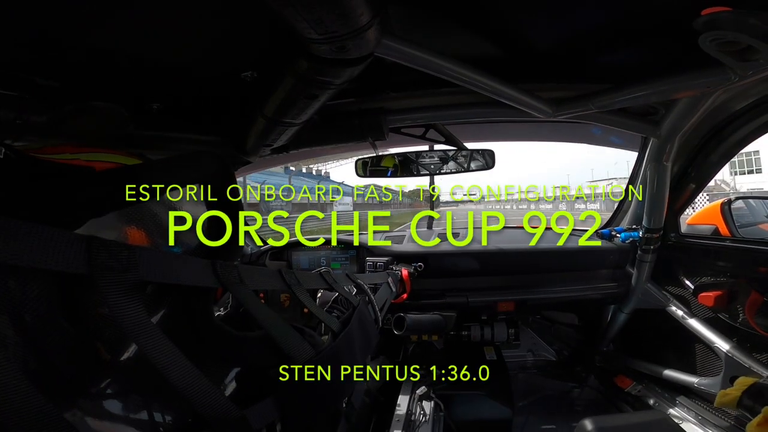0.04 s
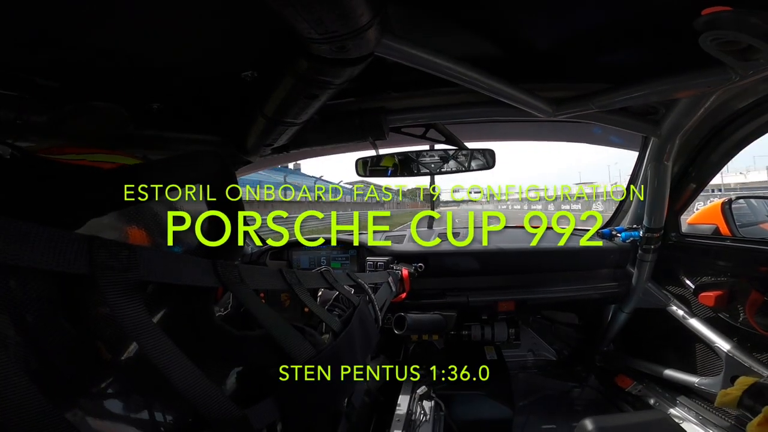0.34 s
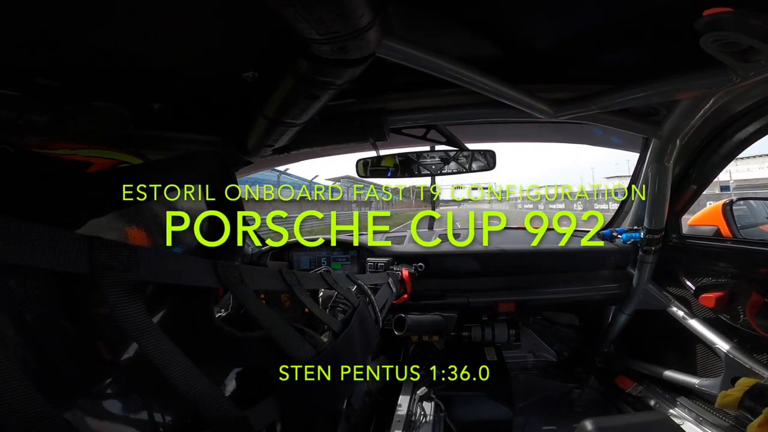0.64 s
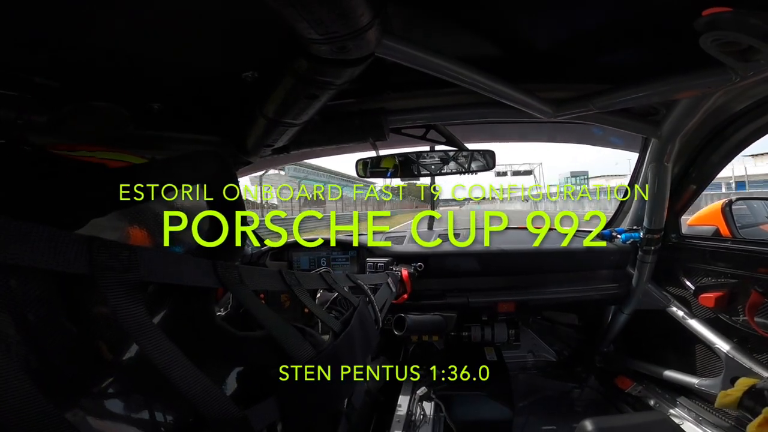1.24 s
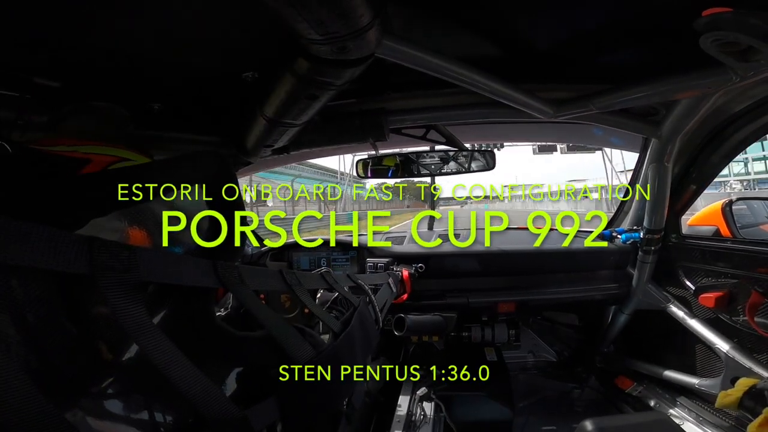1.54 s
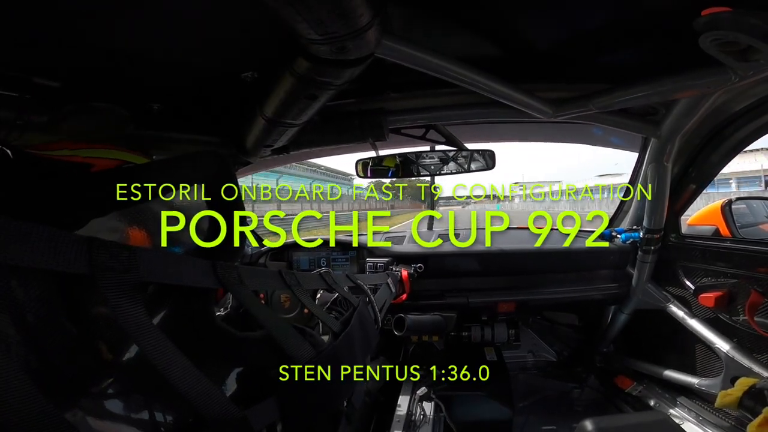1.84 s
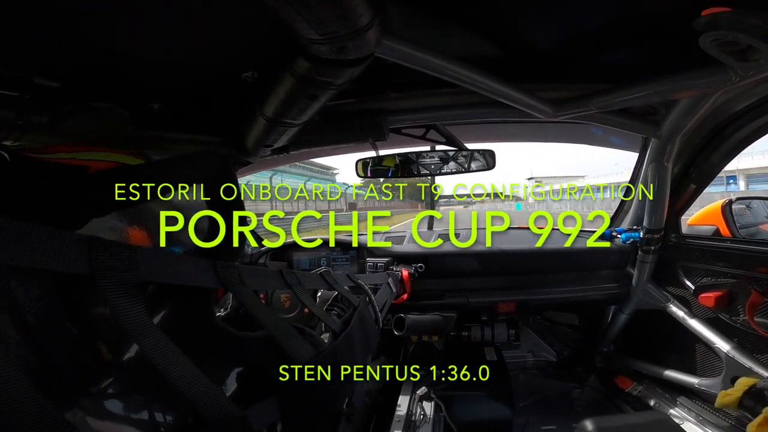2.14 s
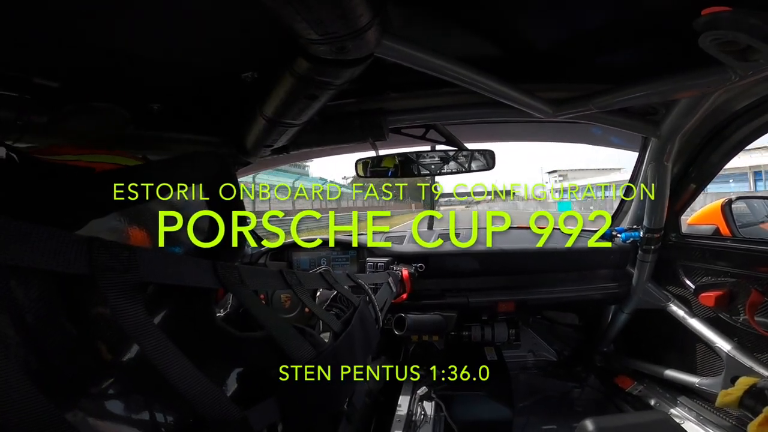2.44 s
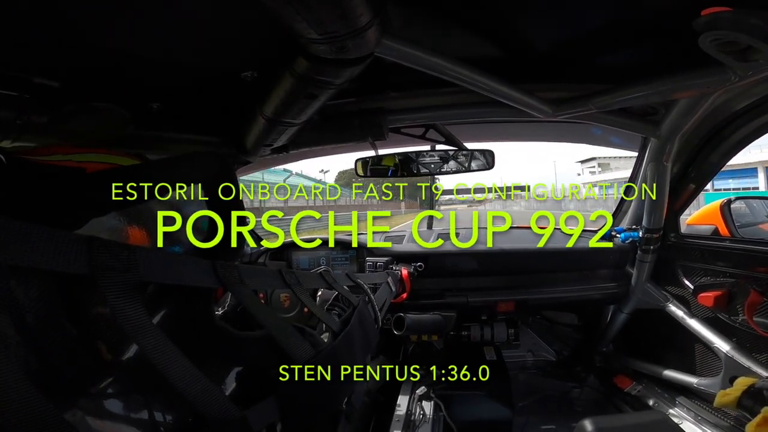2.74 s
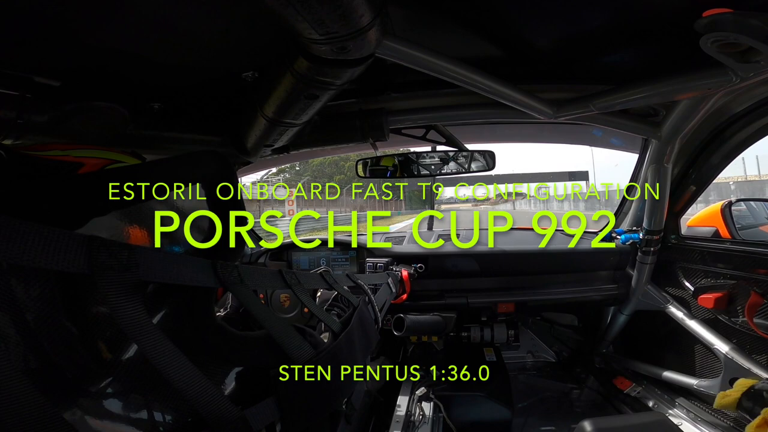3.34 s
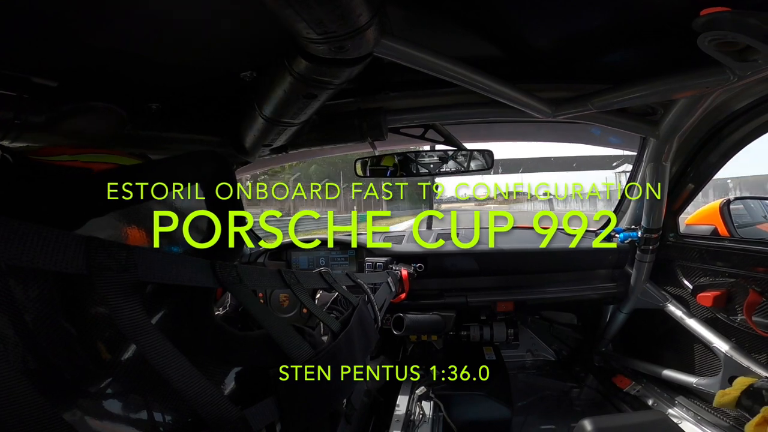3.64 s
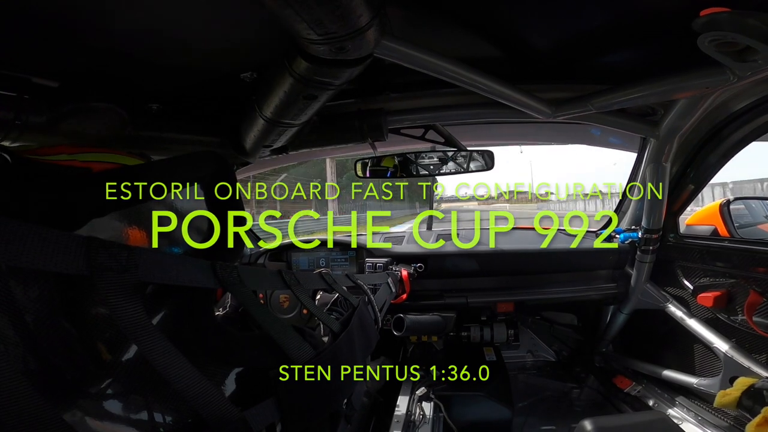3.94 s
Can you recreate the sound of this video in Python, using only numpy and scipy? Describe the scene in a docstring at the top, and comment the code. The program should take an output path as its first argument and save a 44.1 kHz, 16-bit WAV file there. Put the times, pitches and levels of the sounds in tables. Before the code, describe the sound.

A race car engine drones loudly at full throttle, heard inside the cockpit with high gear whine, low body rumble and tyre and wind roar. At about 0.6 seconds it shifts up: the exhaust thumps, the engine drops in pitch, and the whine wobbles and rattles briefly. The whine then climbs slowly, swelling and fading on either side. From 2.8 seconds the drone grows fuller, continuing to 4 seconds.

```python
"""Inside a race car at full throttle on a straight. From the start the body rumbles, tyres and wind roar,
a six-cylinder engine drones and straight-cut gears whine, climbing with road speed.
At 0.6 s it shifts up: the ignition cuts, the exhaust thumps and the engine drops in pitch.
The twisted driveline shudders, so the whine wobbles and rattles, then settles. As the car pulls on, the
gear tones swell and fade at each side of the bare cabin, and from 2.8 s the drone grows fuller."""
import sys
import numpy as np
from scipy import signal
from scipy.fft import rfft, irfft
from scipy.io import wavfile
from scipy.ndimage import uniform_filter1d, minimum_filter1d

SR = 44100
rng = np.random.default_rng(int(sys.argv[2]) if len(sys.argv) > 2 else 0)


def dump(signal):
    """Clip the signal to [-1, 1] and save it as 16-bit WAV at the path in sys.argv[1]."""
    limited = np.clip(np.atleast_2d(signal).T, -1, 1)
    pcm = np.round(limited * 32767).astype(np.int16)
    wavfile.write(sys.argv[1], SR, pcm)


N = 176400
t = np.arange(N) / SR


def undb(db):
    """Decibels to gain."""
    return 10 ** (np.asarray(db) / 20)


def curve(table, column=1):
    """Automation lane: one column of a table, joined by straight lines in time."""
    rows = np.array(table, float)
    return np.interp(t, rows[:, 0], rows[:, column])


def eq_gain(spectrum, hz):
    """Gain of an EQ curve at the given frequencies."""
    rows = np.array(spectrum, float)
    return undb(np.interp(np.log(hz + 1e-9), np.log(rows[:, 0]), rows[:, 1]))


def pan(db):
    """Constant-power gains that put the left side db above the right."""
    gains = undb(np.array([[db], [-db]]) / 2)
    return gains / np.sqrt(np.mean(gains ** 2))


def wander(rate_hz):
    """Smooth random modulator of spread 1 that changes about rate_hz times a second."""
    steps = signal.resample(rng.standard_normal(1024), 1024 * 4)
    return np.interp(t * rate_hz * 4, np.arange(len(steps)), steps)


def noise(spectrum, correlation):
    """Stereo noise of rms 1 with a given EQ and left-right correlation."""
    hz = np.arange(N // 2 + 1) * SR / N
    mid, side = irfft(rfft(rng.standard_normal((2, N))) * eq_gain(spectrum, hz), N)
    out = mid * np.sqrt(1 + correlation) + side * np.sqrt(1 - correlation) * np.array([[1], [-1]])
    return out / out.std()


def steady(sound, window_s=.07):
    """Level out the chance swells of a noise, so that it drones."""
    power = uniform_filter1d(np.mean(sound ** 2, axis=0), int(window_s * SR))
    return sound / np.sqrt(power)


def turn(hz):
    """Running phase of a rotation."""
    return 2 * np.pi * np.cumsum(hz) / SR


def tone(phase, flutter, rate_hz):
    """A partial of rms near 1 whose level and phase flutter."""
    in_phase = 1 + flutter * wander(rate_hz) / np.sqrt(2)
    quadrature = flutter * wander(rate_hz) / np.sqrt(2)
    return np.sqrt(2 / (1 + flutter ** 2)) * (in_phase * np.sin(phase) + quadrature * np.cos(phase))


# EQ of the body rumble: f/Hz, level/dB
RUMBLE_EQ = [(15, -36), (30, -4), (44, 4.5), (58, 8), (75, 6), (95, 6), (122, 2.5), (150, -1.5), (205, 0),
             (250, -9), (320, -18.5), (500, -71)]
# EQ of the deep buffeting: f/Hz, level/dB
BUFFET_EQ = [(15, -35), (33, -2.5), (45, 7), (55, 1), (75, -16), (150, -64.5)]
# Fader of the buffeting: t/s, level/dB
BUFFET_FADER = [(0, -32), (.5, -26.5), (1.2, -24), (1.9, -19), (2.3, -28.5), (2.8, -27), (3.1, -22),
                (4, -27)]


def body_rumble():
    """The low bed, almost mono: the body rumbles evenly while deep buffeting swells and ebbs."""
    rumble = steady(noise(RUMBLE_EQ, correlation=.97)) * undb(-19)
    buffet = steady(noise(BUFFET_EQ, correlation=.97)) * undb(curve(BUFFET_FADER))
    return rumble + buffet


# EQ of the tyre and wind roar: f/Hz, level/dB
ROAR_EQ = [(200, -4.5), (350, 1.5), (550, -4.5), (800, -2.5), (1100, 2.5), (1600, -0.5), (2100, -3),
           (2750, -1), (3300, -9), (4500, -13.5), (7000, -46)]
# EQ of the wind hiss: f/Hz, level/dB
HISS_EQ = [(2000, -17), (3500, 1.5), (4700, -1), (5800, -8), (7000, -7.5), (8000, -19), (9200, -17),
           (11000, -30.5), (12800, -33), (14500, -54)]
# EQ of the treble splash: f/Hz, level/dB
SPLASH_EQ = [(4000, -12), (8000, 0), (12000, 0), (14500, -16)]
# Faders of tyres and wind: t/s, roar level/dB, hiss level/dB
ROAD_FADERS = [(0, -30, -34.5), (.15, -26.5, -35), (.58, -21, -32), (.75, -22.5, -33.5), (.9, -20.5, -34),
               (1.3, -23.5, -33), (1.9, -27, -36), (2.2, -29, -37.5), (2.8, -27.5, -38), (3.02, -21.5, -33),
               (3.3, -24, -33.5), (3.8, -27.5, -36), (4, -24.5, -34.5)]


def tyres_and_wind(cycle_phase, splash_s=3.0, splash_decay_s=.02):
    """A roar that throbs with the six firings of each cycle, wide wind hiss and one splash of treble."""
    firings = 1 + .49 * np.sin(6 * cycle_phase)
    roar = noise(ROAR_EQ, correlation=.47) * pan(4.5) * firings
    roar *= undb(curve(ROAD_FADERS, column=1) + .5 * wander(25.25))
    hiss = noise(HISS_EQ, correlation=.053) * undb(curve(ROAD_FADERS, column=2) + .5 * wander(24))
    splash = noise(SPLASH_EQ, correlation=0) * undb(-46) * np.exp(-abs(t - splash_s) / splash_decay_s)
    return roar + hiss + splash


# Engine harmonics: order (multiple of the cycle rate), level/dB in the lower gear,
# early level/dB and late level/dB in the higher gear, left-over-right pan/dB
DRONE_ORDERS = [(2, -28.5, -21.5, -22.5, 1.5), (4, -40, -39.5, -32.5, 4), (5, -38, -39, -41.5, -5),
                (6, -27.5, -23, -21.3, 2.5), (7, -32.5, -28.8, -27, -2), (8, -28.5, -34, -35, 3.5),
                (9, -41, -50, -35.5, 14.5), (10, -39.5, -49.5, -37, -1), (11, -42, -44.5, -54.5, 6),
                (12, -34, -43, -45, 7), (13, -30, -44.5, -41.5, -1), (14, -42, -38, -42, 7.5),
                (15, -35.5, -40.5, -44, 0.5), (16, -42, -54.5, -46, 1), (17, -45, -42.5, -36, 5),
                (18, -33.5, -46, -37, 6), (28, -35, -39, -36.5, 6), (32, -53, -43, -50, 10)]


def engine_drone(cycle_phase, gear, fuller_s=2.79, blend_s=.22):
    """Harmonics of the engine cycle drone; their balance changes with the gear and later fills out."""
    late = np.clip((t - fuller_s) / blend_s, 0, 1)
    drone = np.zeros((2, N))
    for order, low_db, high_db, late_db, pan_db in DRONE_ORDERS:
        flutter = .29 if order == 2 else .083  # the low boom wavers most
        partial = tone(order * cycle_phase + rng.uniform(0, 2 * np.pi), flutter, rate_hz=22.01)
        level_db = low_db + (high_db - low_db) * gear + (late_db - high_db) * late
        drone += pan(pan_db) * partial * undb(level_db)
    return drone


# EQ of the engine rasp: f/Hz, level/dB per order
RASP_EQ = [(1150, -41.5), (1500, -44), (1900, -42), (2400, -45.5), (2900, -48), (3300, -53), (4400, -59.5),
           (5500, -63)]


def engine_rasp(cycle_phase, gear, scatter_db=3, upshift_drop_db=4.5):
    """A dense comb of high orders, scattered in level and pan, rasps harder in the lower gear."""
    mean_cycle_hz = cycle_phase[-1] / (2 * np.pi) / t[-1]
    rasp = np.zeros((2, N))
    for order in range(19, 76):
        size, side = rng.standard_normal(2)
        partial = tone(order * cycle_phase + rng.uniform(0, 2 * np.pi), flutter=.35, rate_hz=9)
        gain = eq_gain(RASP_EQ, order * mean_cycle_hz) * undb(scatter_db * size)
        rasp += pan(4.5 + 5 * side) * gain * partial
    return rasp * undb(upshift_drop_db * (.5 - gear))


# EQ of the exhaust splutter during the ignition cut: f/Hz, level/dB
SPLUTTER_EQ = [(90, -18), (180, 0), (300, 4.5), (700, -8), (1500, -22), (6000, -90)]


def exhaust_thump(cycle_phase, cut):
    """While the ignition is cut, the exhaust splutters and thumps at one bank's firing rate."""
    bank = tone(3 * cycle_phase, flutter=.44, rate_hz=90)
    splutter = noise(SPLUTTER_EQ, correlation=1)
    return cut ** 2 * (undb(-23.5) * bank + undb(-23) * splutter)


def engine(cycle_phase, gear, shift_swell_db=2):
    """The six-cylinder: drone and rasp swell briefly through the shift, along with the exhaust thump."""
    cut = np.sin(np.pi * gear)  # peaks halfway between the gears
    running = engine_drone(cycle_phase, gear) + engine_rasp(cycle_phase, gear)
    return running * undb(shift_swell_db * cut) + exhaust_thump(cycle_phase, cut)


# Faders of the whistles: t/s, then level/dB of 3 x drive, drive + pinion, 2 x drive + pinion,
# 3 x pinion, 4 x pinion
WHISTLE_FADERS = [(0, -44, -52, -62, -76, -82), (.75, -40, -56, -59, -74, -78),
                  (.92, -40, -42.5, -51, -65, -72), (1.35, -36, -44.5, -50, -66, -70),
                  (1.8, -37, -47, -52, -69, -73), (2.15, -42, -51, -64, -75, -78),
                  (2.6, -42.5, -45.5, -66, -65, -81), (3.0, -36.5, -42.5, -64, -67, -74),
                  (3.3, -35.5, -36, -64, -66, -76), (3.7, -45, -46.5, -62, -64, -80),
                  (4, -42, -46, -56, -71, -77)]


def gear_whistles(drive, pinion, pans_db=(8, 4, 1, 0, -7)):
    """Faint overtones and sum tones of the two meshes, fluttering separately in each ear."""
    phases = [3 * drive, drive + pinion, 2 * drive + pinion, 3 * pinion, 4 * pinion]
    whistles = np.zeros((2, N))
    for column, (phase, pan_db) in enumerate(zip(phases, pans_db), 1):
        sides = np.array([tone(phase, flutter=.59, rate_hz=12) for _ in range(2)])
        whistles += pan(pan_db) * undb(curve(WHISTLE_FADERS, column)) * sides
    return whistles


# Faders of the drive tone, the pinion tone and their octaves: t/s, left level/dB, right level/dB
DRIVE_FADERS = [(0.0, -19.5, -27), (0.15, -18.5, -28), (0.3, -25.5, -50), (0.55, -33, -22.5),
                (0.645, -25, -28), (0.675, -18.5, -27), (0.79, -17.5, -24), (0.825, -25, -28),
                (0.86, -22.5, -24), (0.9, -27, -25), (1.0, -31, -23), (1.1, -23, -19.5), (1.35, -19, -22),
                (1.65, -15.5, -27.5), (2.2, -15, -25), (2.65, -17, -29.5), (2.85, -20, -45),
                (2.95, -25, -38), (3.15, -26, -26.5), (3.6, -16.5, -23), (4.0, -18, -29)]
DRIVE_OCTAVE_FADERS = [(0.0, -19.5, -22), (0.45, -23.5, -29), (0.65, -27.5, -30), (0.8, -28, -31),
                       (1.0, -31, -32), (1.2, -20, -24), (1.85, -28, -31.5), (2.0, -23.5, -28),
                       (2.2, -31, -38), (2.8, -23, -33), (3.25, -30, -38), (3.45, -22.5, -30),
                       (3.55, -25, -34), (4.0, -22, -29)]
PINION_FADERS = [(0.0, -32.5, -39), (0.3, -25, -27.5), (0.5, -25.5, -28), (0.61, -27, -33),
                 (0.64, -42, -44), (0.665, -28, -30), (0.8, -23.5, -31.5), (1.3, -24, -23),
                 (1.45, -38, -41), (1.65, -31.5, -29), (2.0, -23.5, -23.5), (2.2, -22, -35),
                 (2.6, -24.5, -26), (2.86, -23.5, -31), (2.92, -33, -35), (3.1, -39, -32),
                 (3.2, -25.5, -42), (3.5, -22.5, -37), (3.85, -29, -25), (4.0, -38, -22.5)]
PINION_OCTAVE_FADERS = [(0.0, -48, -61), (0.35, -48, -51), (0.55, -49, -41.5), (0.75, -42, -49),
                        (0.92, -37, -36), (1.13, -43, -53), (1.3, -34, -36), (1.45, -44, -44),
                        (1.78, -42.5, -60), (2.02, -45, -37.5), (2.25, -43, -41), (2.37, -48, -50),
                        (2.52, -38.5, -39), (2.8, -52, -54), (2.97, -32, -45), (3.18, -33.5, -38),
                        (3.35, -44.5, -53), (4.0, -47, -46)]
# Unsteadiness of the tooth contact: t/s, relative roughness
TOOTH_CHATTER = [(0, 0), (.25, 0.22), (.55, 0.13), (.75, 0.35), (.9, 0.17), (1.3, 0.07), (2, 0),
                 (2.8, 0.12), (3.05, 0.18), (3.4, 0.12), (4, 0.14)]


def gear_whine(drive, pinion, throb, rattle):
    """Meshing teeth sing at their rate and its octave; the drive tones throb, the pinion tones rattle."""
    chatter = curve(TOOTH_CHATTER)
    voices = [(drive, DRIVE_FADERS, 1.4 * chatter, throb, -.53),
              (2 * drive, DRIVE_OCTAVE_FADERS, .85 * chatter, throb, -1.2),
              (pinion, PINION_FADERS, .7 * chatter + rattle, 1, -1.12),
              (2 * pinion, PINION_OCTAVE_FADERS, 1.2 * chatter + rattle, 1, -1.47)]
    whine = np.zeros((2, N))
    for phase, faders, flutter, tremolo, left_offset_rad in voices:
        gains = tremolo * undb([curve(faders, column=1), curve(faders, column=2)])
        whine += gains * tone(phase + np.array([[left_offset_rad], [0]]), flutter, rate_hz=70)
    return whine


SHUDDER_S, SHUDDER_HZ = .62, 16.2
BEND_DEPTH, BEND_DECAY_S = .105, .062
THROB_DB, THROB_DECAY_S, THROB_LAG_S = 6, .35, .009
RATTLE_DEPTH, RATTLE_DECAY_S = 1.2, .12


def gears(mesh_hz, pinion_ratio=2.876, jitter=.00074):
    """Two meshes whine; the shift sets the driveline swinging, which bends pitch and pulses the load."""
    since = np.maximum(t - SHUDDER_S, 0)
    swing = -np.sin(2 * np.pi * SHUDDER_HZ * since)
    load_swing = -np.sin(2 * np.pi * SHUDDER_HZ * np.maximum(since - THROB_LAG_S, 0))
    bend = BEND_DEPTH * np.exp(-since / BEND_DECAY_S) * swing
    throb = undb(THROB_DB * np.exp(-since / THROB_DECAY_S) * load_swing)
    rattle = RATTLE_DEPTH * np.exp(-since / RATTLE_DECAY_S) * (since > 0)
    drive = turn(mesh_hz * (1 + bend + jitter * wander(35.17)))
    pinion = pinion_ratio * drive
    return gear_whine(drive, pinion, throb, rattle) + gear_whistles(drive, pinion)


# Mesh rate of the final drive, which follows road speed: t/s, f/Hz
MESH_PITCH = [(0, 1192), (.5, 1205.4), (1, 1213), (2, 1234), (2.5, 1243.7), (3, 1252.3), (4, 1273.7)]
# The upshift, where the revs sag during the cut and then the dogs catch: t/s, gear (0 lower, 1 higher)
UPSHIFT = [(.608, 0), (.63, .45), (.668, .62), (.68, 1)]
LOW_GEAR_TEETH, HIGH_GEAR_TEETH = 16.735, 19.48  # final-drive teeth passing per engine cycle


def scene():
    """Road speed drives the gears and, through the engaged ratio, the engine."""
    mesh_hz = curve(MESH_PITCH)
    gear = curve(UPSHIFT)
    cycle_hz = mesh_hz / np.interp(gear, [0, 1], [LOW_GEAR_TEETH, HIGH_GEAR_TEETH])
    cycle_phase = turn(cycle_hz * (1 + .0012 * wander(30.13)))  # the revs jitter slightly
    return engine(cycle_phase, gear) + gears(mesh_hz) + body_rumble() + tyres_and_wind(cycle_phase)


def record(dry, ceiling=.86, top_hz=14650):
    """Master chain: a limiter holds down the highest peaks and a steep low-pass cuts the top."""
    needed_gain = np.minimum(1, ceiling / (abs(dry).max(axis=0) + 1e-9))
    gain = uniform_filter1d(minimum_filter1d(needed_gain, size=441), size=441)  # 10 ms windows
    low_pass = signal.ellip(8, .2, 70, top_hz, fs=SR, output="sos")
    return signal.sosfilt(low_pass, dry * gain)


dry = scene()
out = record(dry)
dump(out)
```